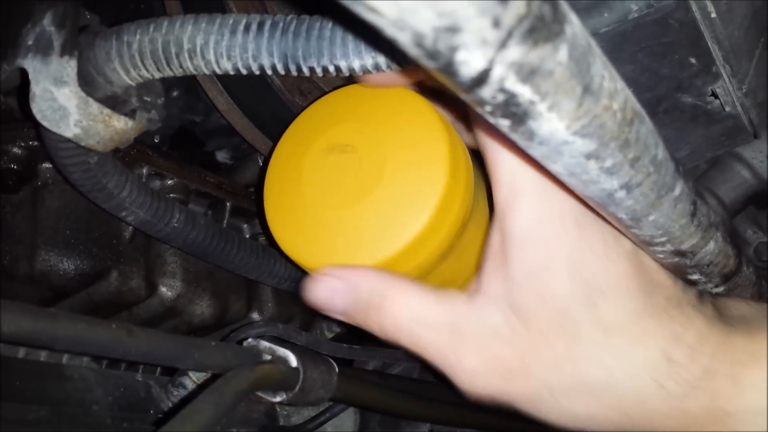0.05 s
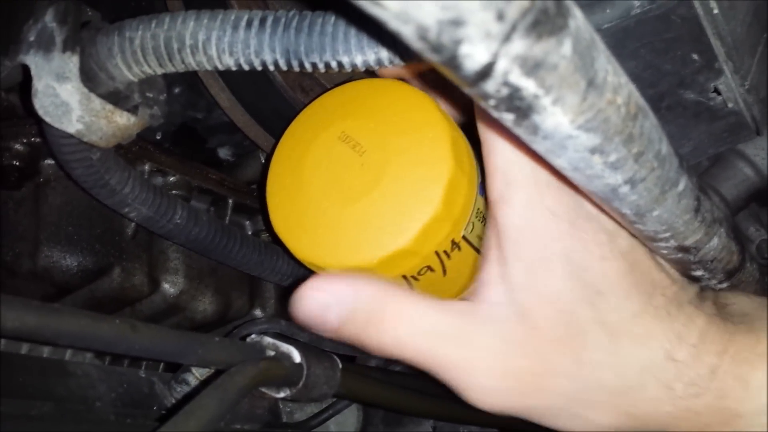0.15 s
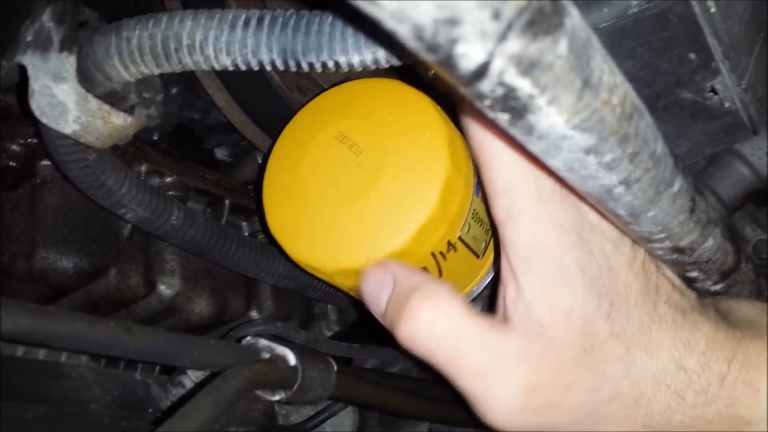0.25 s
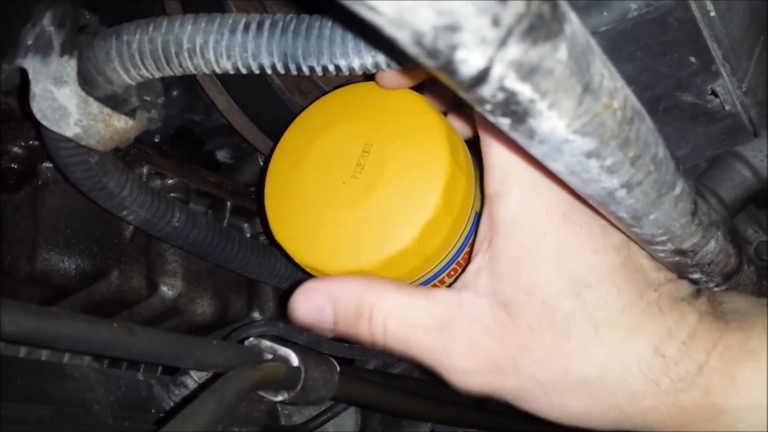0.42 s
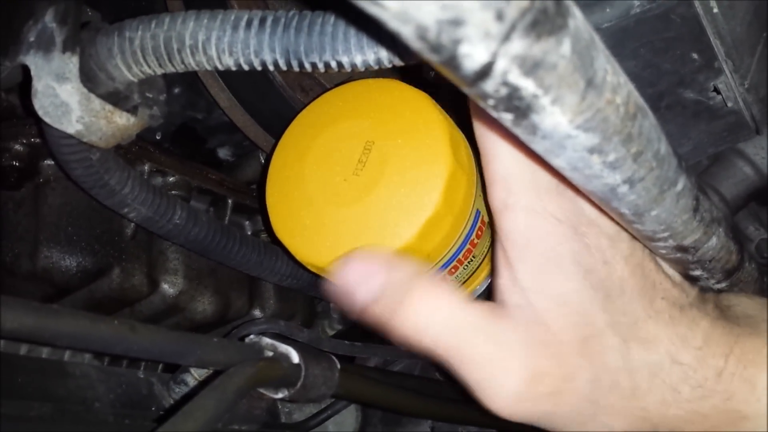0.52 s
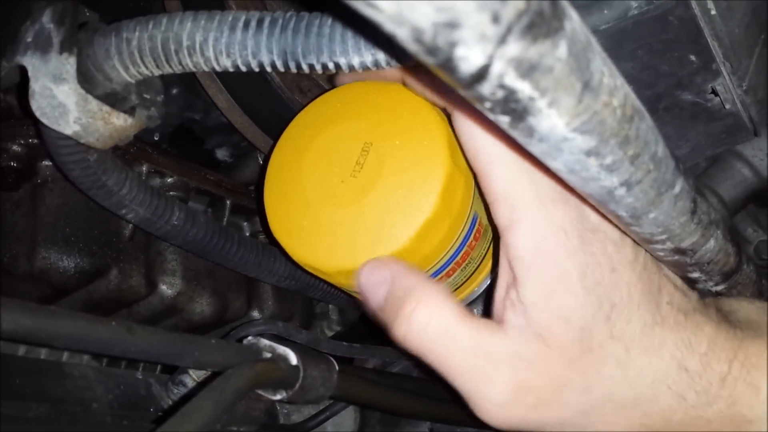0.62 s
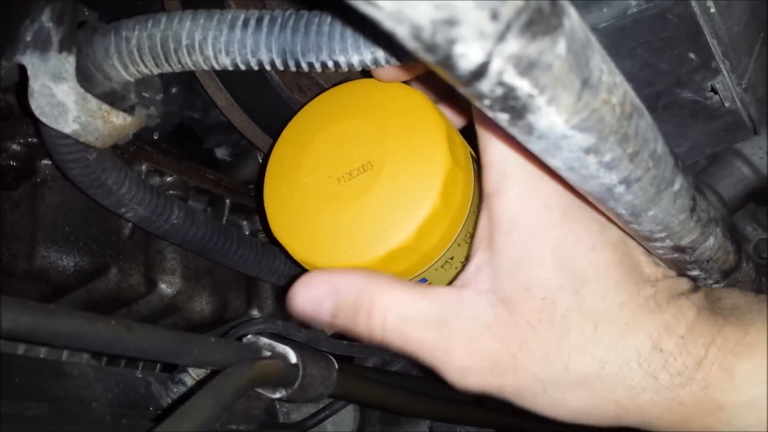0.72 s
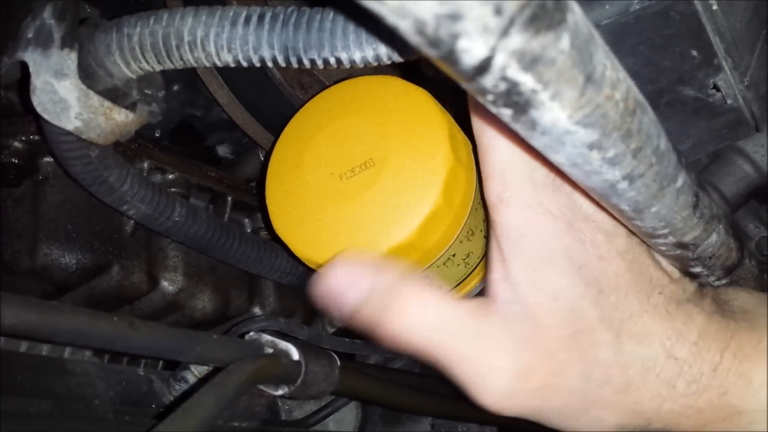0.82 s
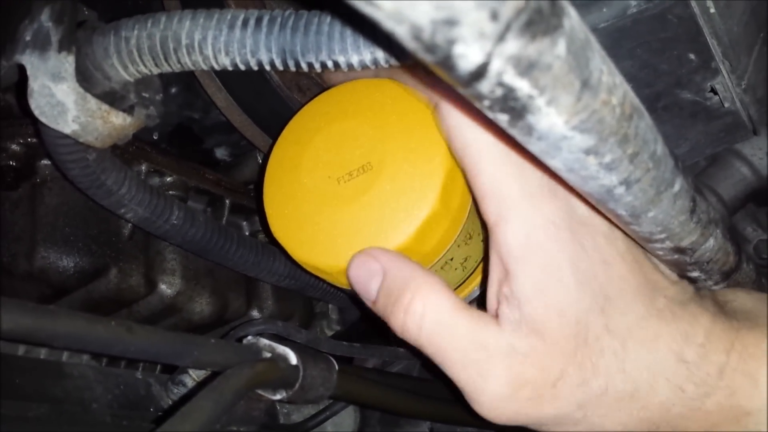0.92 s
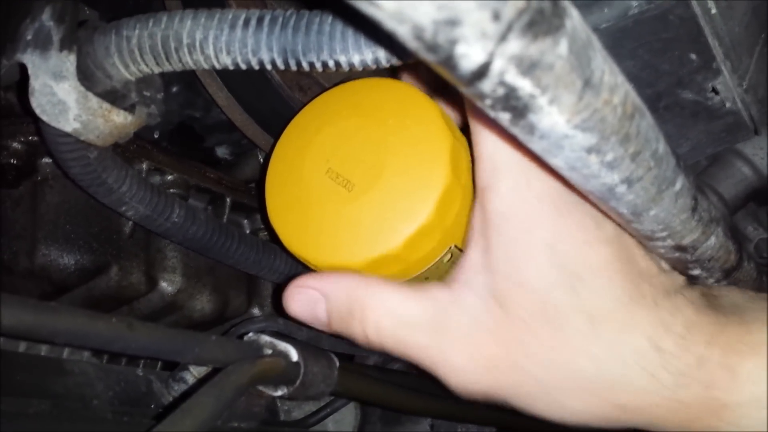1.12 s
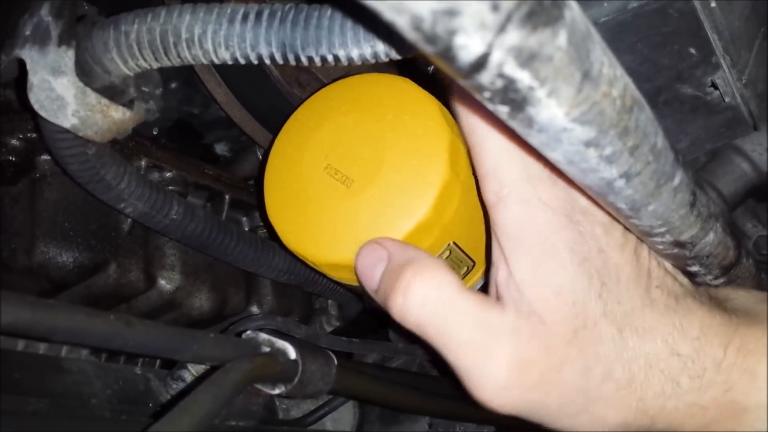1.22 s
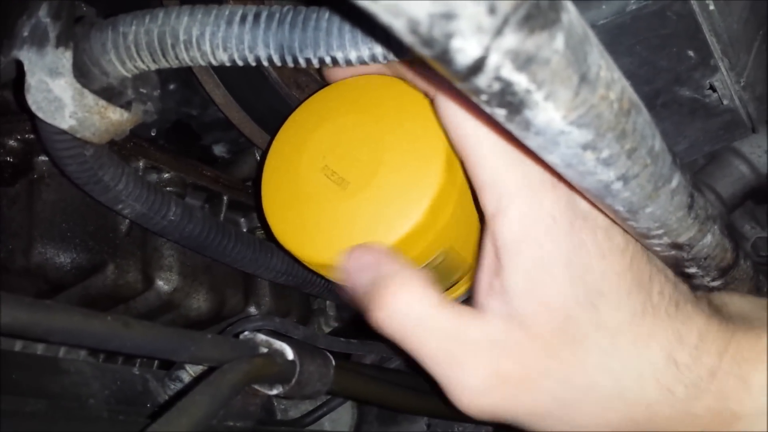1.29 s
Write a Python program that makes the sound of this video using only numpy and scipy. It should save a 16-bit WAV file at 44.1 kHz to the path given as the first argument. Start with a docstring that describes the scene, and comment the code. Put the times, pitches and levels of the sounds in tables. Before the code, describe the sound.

A hand twists a metal oil filter close by, opening on the tail of a scrape. Four quick turns follow at about 0.1, 0.45, 0.75 and 1.05 seconds. Each starts with a bright finger tick and dull knock, then skin hisses and chirps on the ringing shell over a low thread rub. The last ends near 1.3 seconds. A faint motor hums behind, with a brief garage echo.

```python
"""Under a car in a garage, a hand spins an oil filter on its thread in four quick turns.
A motor hums behind it, and the engine bay and the garage echo briefly. The thread gives a low rub.
For each turn the fingers land on the can with a tick and a dull knock. Then skin drags over the
thin steel shell in thousands of tiny slips, which hiss, chirp and make the shell ring."""
import sys
import numpy as np
from scipy import signal
from scipy.fft import rfft, irfft
from scipy.io import wavfile

SR = 44100
rng = np.random.default_rng(int(sys.argv[2]) if len(sys.argv) > 2 else 0)


def file_out(sig):
    """Save sig as 16-bit WAV at sys.argv[1]."""
    # one column per channel
    cols = np.atleast_2d(sig).T
    # limit, then scale
    lim = np.clip(cols, -1, 1)
    pcm = np.round(lim * 32767).astype(np.int16)
    wavfile.write(sys.argv[1], SR, pcm)


N = 59535
T = np.arange(N) / SR
# How alike left and right are, from 0 (unrelated) to 1 (the same).
BASS_LIKENESS, SHELL_LIKENESS, TREBLE_LIKENESS = 0.61, 0.67, 0.14


def from_db(db):
    """Turns decibels (dB) into a number to multiply by."""
    return 10 ** (np.asarray(db) / 20)


def pan(db):
    """Shares a sound between the sides: plus dB is left, minus is right."""
    gains = from_db(np.array([[.5], [-.5]]) * db)
    return gains / np.sqrt(np.mean(gains ** 2, axis=0))


def drift(hz):
    """A smooth random wobble of about 1 either way, mostly slower than hz."""
    smoothing = signal.butter(2, hz, fs=SR, output="sos")
    slow = signal.sosfilt(smoothing, rng.standard_normal(2 * N))[N:]
    return slow / slow.std()


def response(points, size=2048):
    """A short click with the tone given by rows of (Hz, dB)."""
    hz, db = np.transpose(points)
    grid = np.maximum(np.arange(size // 2 + 1) * SR / size, 1)
    cepstrum = irfft(np.log(from_db(np.interp(np.log(grid), np.log(hz), db))))
    # Move the energy to the start of the click.
    cepstrum[1:size // 2] *= 2
    cepstrum[size // 2 + 1:] = 0
    return irfft(np.exp(rfft(cepstrum)))


def through(x, impulse):
    """Passes a sound through a click, ring or echo whose energy is set to 1."""
    impulse = np.atleast_2d(impulse)
    impulse = impulse / np.linalg.norm(impulse, axis=1, keepdims=True)
    return signal.fftconvolve(x, impulse, axes=1)[:, :N]


def colour(x, points):
    """Makes some pitches of a sound stronger and others weaker."""
    return through(x, response(points))


def ring(x, notes, phase_gap=0):
    """Rings an object's own notes, phase_gap radians apart left and right. Wide notes die fast."""
    t = T[:N // 4]
    phases = phase_gap * rng.choice([-1, 1], (len(notes), 1, 1)) * np.array([[.5], [-.5]])
    ringing = 0
    for k, (hz, width, db) in enumerate(notes):
        fade = from_db(db) * width * np.exp(-np.pi * width * t)
        ringing += (-1) ** k * fade * np.cos(2 * np.pi * hz * t + phases[k])
    return through(x, ringing)


def struck(start, db, hz, width_hz, swell_s=0.0011):
    """One note that swells under a soft hit, then dies away."""
    t = np.maximum(T - start, 0)
    shape = (1 - np.exp(-t / swell_s)) * np.exp(-np.pi * width_hz * t)
    return from_db(db) * 2 * shape * np.sin(2 * np.pi * hz * t)


def slips(likeness, per_second=9500, spread_db=1.5, judder_db=2, judder_hz=270):
    """Rubbing is a juddering run of tiny slips, each a click of its own size."""
    sizes = from_db(spread_db * np.minimum(rng.exponential(1, N), 4) + judder_db * drift(judder_hz))
    slipping = rng.random(N) < per_second / SR
    signs = rng.choice([-1, 1], (3, N))   # shared, left, right
    clicks = slipping * sizes * (np.sqrt(likeness) * signs[0] + np.sqrt(1 - likeness) * signs[1:])
    return clicks / clicks.std()


def contact(start, db, length, release_s=0.0019, attack_s=0.0021):
    """The strength of a short touch: it rises, holds and lets go."""
    rise = np.clip((T - start) / attack_s, 0, 1)
    return from_db(db) * rise * np.exp(-np.maximum(T - start - length, 0) / release_s)


def stroke(rows):
    """A strength that follows rows of (seconds, dB), with silence before and after."""
    times, db = np.transpose(rows)
    return from_db(np.interp(T, times, db)) * (T >= times[0]) * (T <= times[-1])


# The tone of the still air. Each row: pitch in Hz, level in dB.
AIR_TONE = [(25, -19), (45, -13), (65, -1.5), (100, 0.5), (170, -5), (300, -9.5), (600, -18), (1500, -21),
            (4000, -21.5), (7000, -19.5), (10000, -24.5), (13500, -23), (15000, -25.5)]
# How wide the air sounds. Each row: pitch in Hz, level of the sides against the middle in dB.
AIR_WIDTH = [(25, 1), (80, -9), (200, -5), (600, -0.5), (2000, 0.5)]
def garage_air(level_db=-63.5):
    """Still air makes a faint rush, much alike on both sides in the bass."""
    middle, side = colour(rng.standard_normal((2, N)), AIR_TONE)
    side = signal.fftconvolve(side, response(AIR_WIDTH))[:N]
    return from_db(level_db) * (middle + side * np.array([[1], [-1]]))


# The hum swells and fades. Each row: time in seconds, level in dB.
HUM_LEVELS = [(0, -59.5), (0.28, -54), (0.4, -56), (0.6, -53), (0.8, -56), (1.0, -62.5), (1.25, -63.5),
              (1.35, -70.5)]
def motor_hum(hz=116.8, waver_db=1.7):
    """A motor hums one low note that wavers in loudness."""
    level_db = np.interp(T, *np.transpose(HUM_LEVELS)) + waver_db * drift(hz=19)
    return from_db(level_db) * np.sqrt(2) * np.sin(2 * np.pi * hz * T)


def echo(x, fade_s):
    """A blur of reflections, different on each side, that drops 60 dB in fade_s."""
    return through(x, rng.standard_normal((2, N)) * from_db(-60 * T / fade_s) * (T > .002))


# The far walls send back less treble. Each row: pitch in Hz, level in dB.
WALL_TONE = [(2000, 5.5), (7000, -5)]
def bay_and_garage(near, bay_db=-5.5, garage_db=-20):
    """Sound bounces briefly round the engine bay, and for longer round the garage."""
    far = signal.fftconvolve(near.mean(0), response(WALL_TONE))[None, :N]
    return from_db(bay_db) * echo(near, fade_s=0.067) + from_db(garage_db) * echo(far, fade_s=0.42)


# The notes of the filter on its mount. Each row: pitch in Hz, width in Hz, level in dB.
MOUNT_NOTES = [(227.3, 14.8, 17.5), (283, 26, 6.5), (500, 79, -5), (975, 13, 4.5), (1333, 51, 3),
               (1658, 25.4, 10)]
def mount(force):
    """The whole filter rocks on its mount and rings low."""
    return ring(force, MOUNT_NOTES)


# The thread's rub, one list for each turn. Each row: time in seconds, level in dB.
THREAD_TURNS = [
    [(0.14, -74), (0.175, -55), (0.205, -47), (0.245, -54.5), (0.275, -56), (0.34, -67.5)],
    [(0.43, -57), (0.48, -55.5), (0.515, -45), (0.55, -50), (0.595, -63), (0.64, -64)],
    [(0.785, -56), (0.83, -51.5), (0.89, -62.5), (0.95, -71.5)],
    [(1.08, -61.5), (1.125, -57), (1.15, -47.5), (1.21, -60), (1.275, -61), (1.32, -92)],
]
# The tone of that rub. Each row: pitch in Hz, level in dB.
THREAD_TONE = [(70, -30), (200, 8.5), (380, 5.5), (600, 8.5), (1600, 4.5), (1950, 1.5), (2600, 5),
               (3400, -4), (6000, -80)]
def thread(rub_db=-3, mount_db=-6.5):
    """The thread rubs as the filter turns, and shakes the mount."""
    force = slips(BASS_LIKENESS) * sum(stroke(rows) for rows in THREAD_TURNS)
    return from_db(rub_db) * colour(force, THREAD_TONE) + from_db(mount_db) * mount(force)


# The hand bumps the filter. Each row: start in seconds, thud level in dB, length in seconds,
# hollow note's pitch in Hz, its level in dB, low thump's level in dB.
HAND_BUMPS = [(0.137, -50, 0.013, 438, -59, -50.5), (0.281, -83, 0.004, 242, -56, -57),
              (0.4458, -42.5, 0.008, 484, -45.5, -57), (0.4923, -34, 0.014, 235, -38.5, -64),
              (0.7752, -49.5, 0.0077, 506, -43.5, -72), (1.068, -59, 0.0045, 1540, -44.5, -63),
              (1.077, -70, 0.0038, 264, -49, -62), (1.1425, -44, 0.0042, 1560, -45.5, -70)]
# The tone of the thud. Each row: pitch in Hz, level in dB.
THUD_TONE = [(50, -26), (150, -18), (350, -3), (600, 1.5), (950, 3.5), (1400, 1), (2000, -13),
             (2800, -12.5), (4500, -31.5)]
def knocks(thud_db=-3.5, mount_db=-8.5):
    """Soft bumps rock the filter: a thud, a low thump and a hollow note that the hand soon stops."""
    push = notes = 0
    for start, db, length, note_hz, note_db, thump_db in HAND_BUMPS:
        push += contact(start, db, length, release_s=0.52 * length)   # long bumps let go slowly
        notes += struck(start, note_db, note_hz, width_hz=66.4)
        notes += struck(start, thump_db, hz=101, width_hz=27)
    force = push * slips(BASS_LIKENESS)
    return from_db(thud_db) * colour(force, THUD_TONE) + from_db(mount_db) * mount(force) + notes


# Rim rubs late in strong turns. Each row: start in seconds, level in dB, length in seconds.
RIM_RUBS = [(0.252, -61, 0.029), (0.552, -52, 0.042)]
# The rim's notes. Each row: pitch in Hz, width in Hz, level in dB.
RIM_NOTES = [(2996, 18, 4.5), (3450, 27, -3.5)]
def rim():
    """Rubbing makes the rim of the can sing two thin, hollow notes."""
    force = sum(contact(*rub) for rub in RIM_RUBS)
    return ring(force * slips(SHELL_LIKENESS), RIM_NOTES)


# Firm taps. Each row: start in seconds, level in dB, left minus right in dB.
FIRM_TAPS = [(0.133, -38, 31), (0.4508, -32, 7), (0.7628, -39, 25), (1.069, -25, 11)]
# The notes of the can's wall. Each row: pitch in Hz, width in Hz, level in dB.
PING_NOTES = [(4210, 124, -1), (5405, 177, 7.5)]
def pings():
    """A firm tap rings two clean notes from the can's wall, until the hand stops them."""
    return sum(pan(side_db) * struck(start, db + note_db, hz, width)
               for start, db, side_db in FIRM_TAPS for hz, width, note_db in PING_NOTES)


# The steel shell's notes. Each row: pitch in Hz, width in Hz, level in dB.
SHELL_NOTES = [(3453, 22, -9.5), (4302, 67, 1.5), (4630, 250, -10), (5434, 125, 0), (6496, 113, 5.5),
               (7230, 89, 9.5), (7320, 41, -16), (8090, 44, 5.5), (9767, 150, -3.5), (10470, 120, -19),
               (10500, 83, -15), (12610, 390, -14.5)]
def shell(force):
    """Slipping skin sets the thin steel ringing with many high notes."""
    return ring(force * slips(SHELL_LIKENESS), SHELL_NOTES, phase_gap=1)


# Fingers land or flick off. Each row: start in seconds, level in dB, length in seconds,
# left minus right in dB, change to the shell's ring in dB.
FINGER_TOUCHES = [(0.097, -58.5, 0.0072, -7, 2.5), (0.1328, -24, 0.0063, -10, -9),
                  (0.4292, -44.5, 0.0062, -2, -13), (0.448, -31, 0.004, -11, -6),
                  (0.732, -50, 0.011, -7, 0), (0.7585, -30.5, 0.0052, -15, -4.5),
                  (1.03, -60, 0.0062, -8, -2), (1.066, -20.5, 0.0066, -9.5, -4),
                  (1.078, -32.5, 0.008, -28, -15)]
# The tone of a tick. Each row: pitch in Hz, level in dB.
TICK_TONE = [(700, -27), (1500, -15.5), (3400, -18), (4200, 5), (4900, -10), (5500, 5), (7300, 3.5),
             (8200, 9.5), (9000, -2), (12000, -7), (14500, -17.5)]
def finger_ticks(tick_db=-7):
    """A fingertip skids for an instant, making a bright tick that rings the shell."""
    on_skin = on_shell = 0
    for start, db, length, side_db, ring_db in FINGER_TOUCHES:
        force = contact(start, db, length) * pan(side_db)
        on_skin += force
        on_shell += force * from_db(ring_db)
    return from_db(tick_db) * colour(on_skin * slips(TREBLE_LIKENESS), TICK_TONE) + shell(on_shell)


# How the hand changes the tone on the left. Each row: pitch in Hz, boost or cut in dB.
HAND_SHADE = [(3000, 10.5), (4500, 4.5), (5500, 11.5), (6400, 6), (7200, -4.5), (8300, -4.5), (9200, -8.5),
              (11000, -2.5), (14000, -5.5)]
def behind_hand(x):
    """The hand is between the fingertips and the left side, so that side sounds duller."""
    left, right = x
    return np.array([signal.fftconvolve(left, response(HAND_SHADE))[:N], right])


# Skin catches on the can. Each row: start in seconds, level in dB, length in seconds.
SKIN_CATCHES = [(0.184, -33.5, 0.016), (0.199, -33, 0.0049), (0.2546, -27, 0.017), (0.272, -16.5, 0.012),
                (0.2988, -32, 0.0083), (0.4324, -37, 0.005), (0.4896, -19.5, 0.0017),
                (0.493, -14.5, 0.0014), (0.58, -19.5, 0.011), (0.593, -26.5, 0.004), (1.147, -30, 0.0049)]
# The tone of a chirp. Each row: pitch in Hz, level in dB.
CHIRP_TONE = [(3000, -31), (5800, -38), (6600, 6), (7200, 15.5), (7900, 8), (9000, -1.5), (14000, -54.5)]
def skin_chirps(chirp_db=-5, side_db=-10):
    """Skin sticks and lets go with a thin, high chirp."""
    force = slips(TREBLE_LIKENESS) * sum(contact(*catch) for catch in SKIN_CATCHES)
    return from_db(chirp_db) * pan(side_db) * colour(force, CHIRP_TONE)


# The scrape: one list for the end of a turn already under way, then one for each of the four turns.
# Each row: time in seconds, level in dB.
SCRAPE_TURNS = [
    [(0.0, -32.5), (0.05, -91)],
    [(0.16, -43), (0.185, -40.5), (0.21, -31), (0.231, -29), (0.253, -39), (0.26, -28.5), (0.28, -26.5),
     (0.292, -44.5), (0.335, -72)],
    [(0.47, -49), (0.505, -36.5), (0.519, -25.5), (0.548, -27.5), (0.576, -31.5), (0.585, -26.5),
     (0.595, -27.5), (0.603, -41.5), (0.64, -65)],
    [(0.768, -32.5), (0.79, -48), (0.815, -34.5), (0.825, -44.5), (0.844, -28), (0.855, -35.5),
     (0.864, -48), (0.876, -41), (0.896, -64), (0.91, -35.5), (0.945, -88)],
    [(1.10, -48), (1.135, -44), (1.152, -40), (1.2, -42.5), (1.221, -36), (1.248, -37.5), (1.26, -41),
     (1.275, -30.5), (1.32, -88)],
]
# How freely the shell rings in each of those turns. Each row: dB at the start, dB at the end.
TURN_RING_DB = [(-11, 1), (-18.5, 3), (-15.5, 2.5), (-24, 2), (-10, -8.5)]
# The tone of the skin's hiss. Each row: pitch in Hz, level in dB.
HISS_TONE = [(2000, -24.5), (3700, -21), (5000, -37), (6000, -10), (6800, -2.5), (7400, -1), (8400, -1.5),
             (9100, -12.5), (11000, -19), (13000, -19.5), (14500, -58)]
def skin_scrape(hiss_db=(-8, -7.5), side_db=(-5.5, -18), flare_db=5, flare_hz=45.8):
    """Skin drags round the can, hissing further to the right. The opening grip frees the shell."""
    on_skin = on_shell = 0
    for rows, ring_db in zip(SCRAPE_TURNS, TURN_RING_DB):
        force = stroke(rows)
        ends = rows[0][0], rows[-1][0]   # each pair of dB values slides between these times
        on_skin += force * from_db(np.interp(T, ends, hiss_db)) * pan(np.interp(T, ends, side_db))
        on_shell += force * from_db(np.interp(T, ends, ring_db)) * pan(db=-5)
    # The shifting grip frees and muffles the shell, so its ring comes in flares.
    flares = from_db(flare_db * np.tanh(drift(flare_hz)))
    return colour(on_skin * slips(TREBLE_LIKENESS), HISS_TONE) + shell(on_shell * flares)


def scene():
    """The filter close by, with the engine bay and the garage around it."""
    fingers = behind_hand(skin_scrape() + skin_chirps()) + finger_ticks() + pings()
    near = fingers + rim() + thread() + knocks()
    return near + bay_and_garage(near) + motor_hum() + garage_air()


def record(dry):
    """Cuts away the very highest treble."""
    cutoff_hz = 14700
    return signal.sosfilt(signal.ellip(10, .3, 80, cutoff_hz, fs=SR, output="sos"), dry)


dry = scene()
out = record(dry)
file_out(out)
```